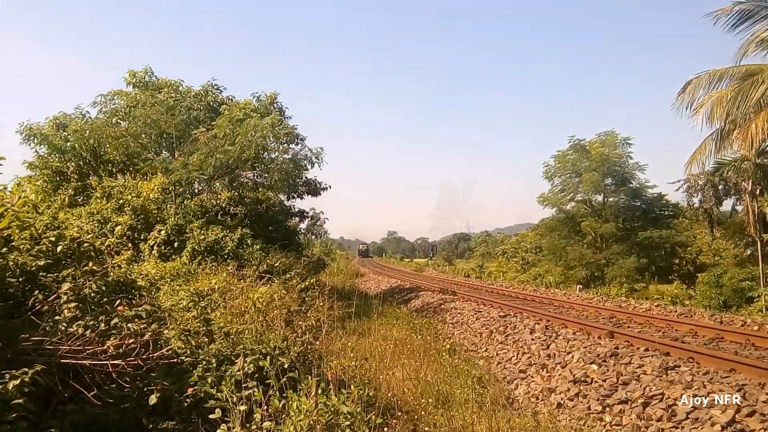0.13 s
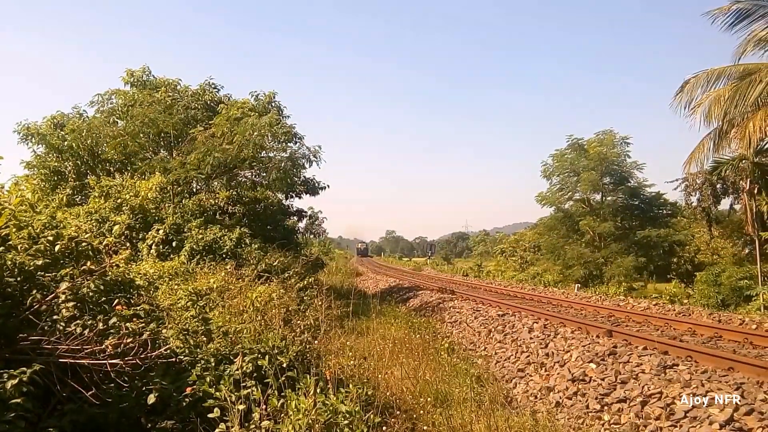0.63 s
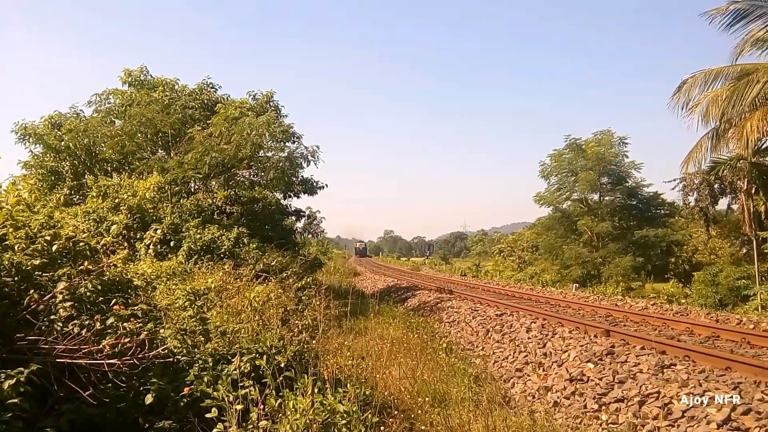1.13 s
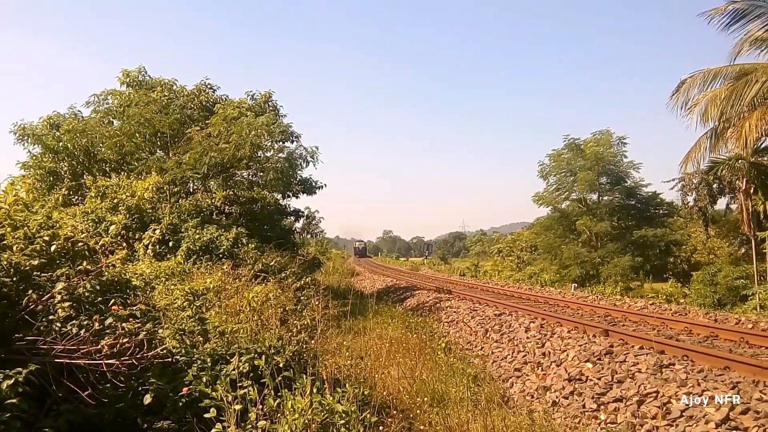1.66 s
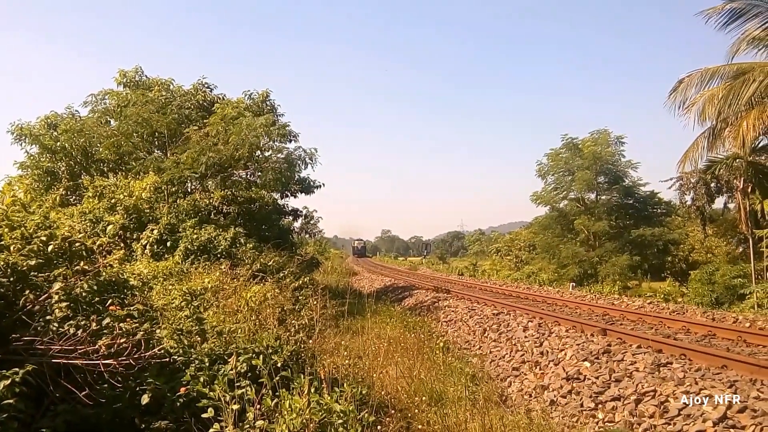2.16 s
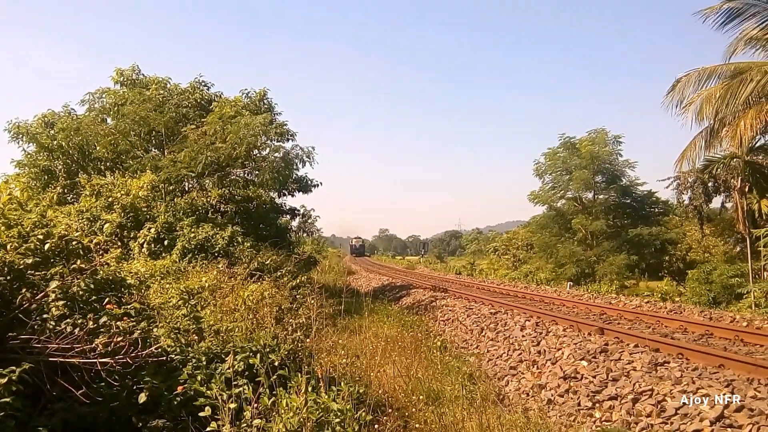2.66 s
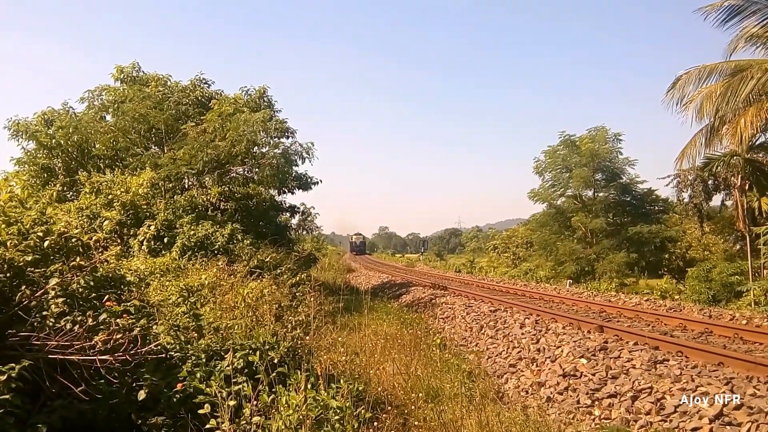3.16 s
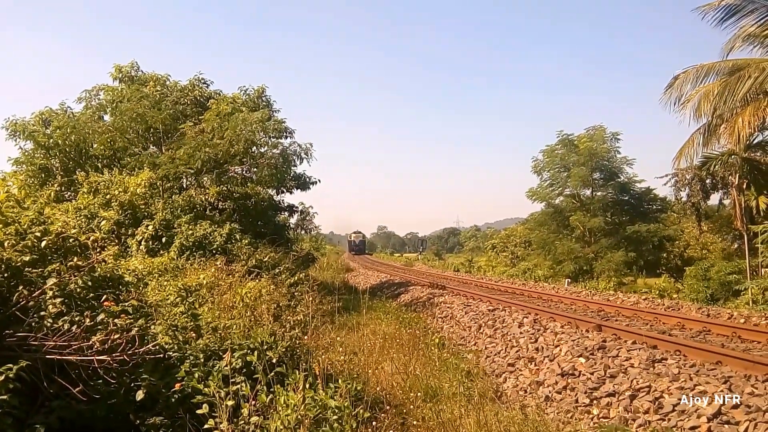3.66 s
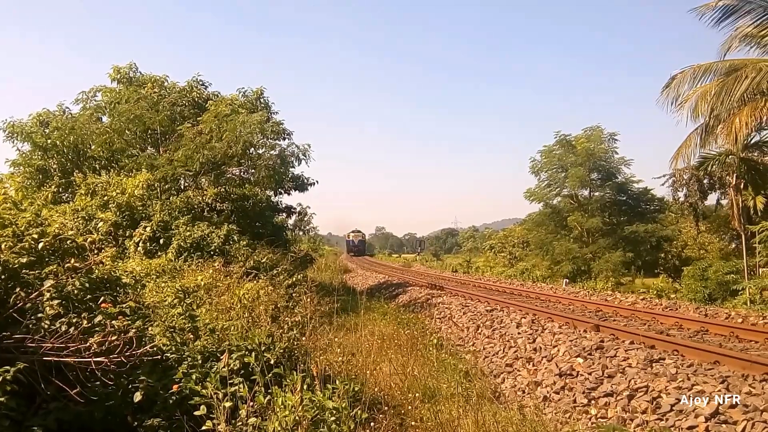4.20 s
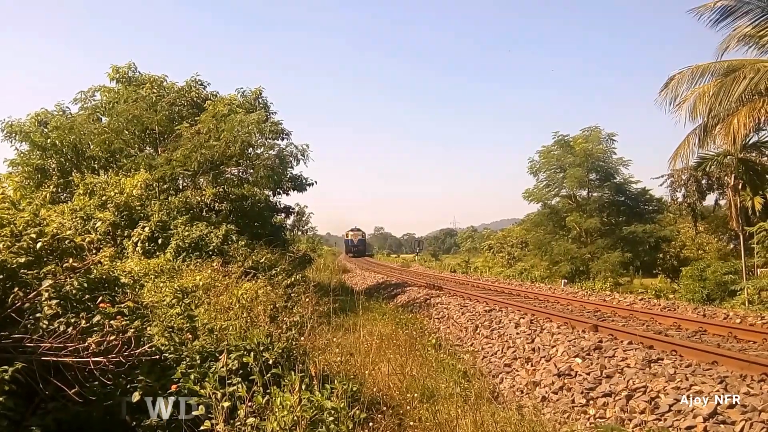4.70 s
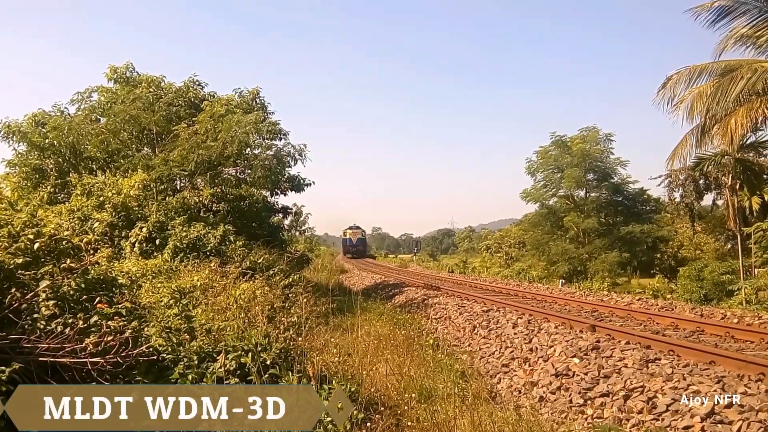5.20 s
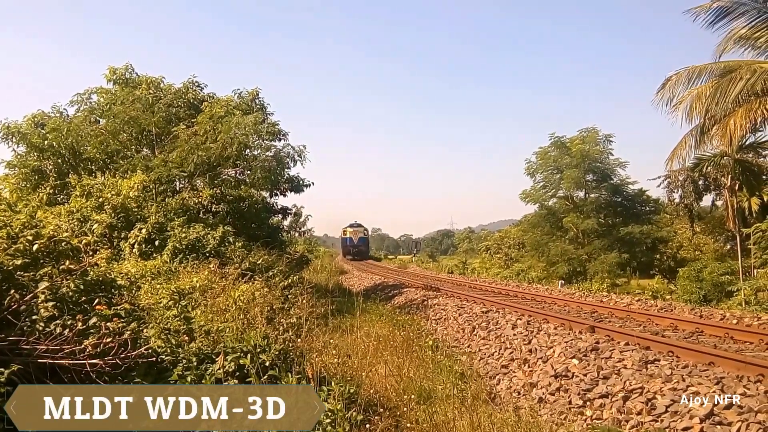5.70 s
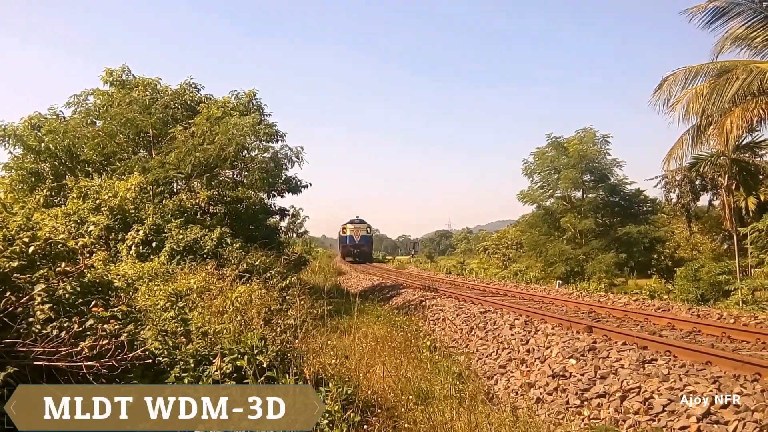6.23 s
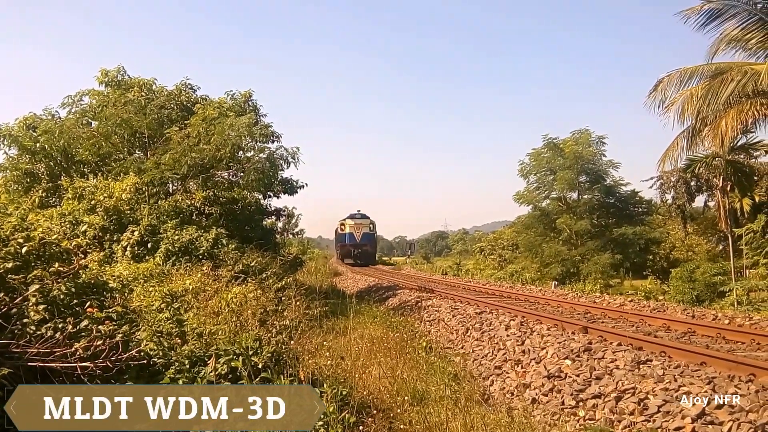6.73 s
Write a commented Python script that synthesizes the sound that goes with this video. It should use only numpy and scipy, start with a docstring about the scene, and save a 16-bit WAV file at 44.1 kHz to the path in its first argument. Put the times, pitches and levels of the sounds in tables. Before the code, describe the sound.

A distant diesel locomotive blows a steady two-note air horn, pauses briefly, squeals back into a second louder blast as its rumble nears along a country track.

```python
"""Two air horns a fifth apart sound from a diesel locomotive coming along a country track from far off.
Each is a sum of aligned overtones plus breath and hiss; it is blowing at the start, shuts once and blows again.
The sound arrives straight and by a bent second path through warm air; trees return late, filtered copies.
Firing pulses ring exhaust resonances under shaped noise, and insects tick in the grass near the microphone."""
import sys
import numpy as np
from scipy import signal
from scipy.fft import rfft, irfft, next_fast_len
from scipy.io import wavfile
from scipy.ndimage import uniform_filter1d

SR = 44100
rng = np.random.default_rng(int(sys.argv[2]) if len(sys.argv) > 2 else 0)


def output_pcm(signal):
    """Save a mono or channel-first signal as 16-bit PCM at the path in sys.argv[1].

    Samples are clipped to [-1, 1] before scaling.
    """
    pcm = np.clip(np.atleast_2d(signal).T, -1, 1) * 32767
    wavfile.write(sys.argv[1], SR, np.round(pcm).astype(np.int16))


def decibels_to_gain(level_db):
    """Convert a level in decibels to a linear amplitude gain (20 dB per decade)."""
    exponent = np.asarray(level_db, float) / 20
    return 10 ** exponent


N = 302083
TIME = np.arange(N) / SR
STEP = 64  # samples between points of the slow curves


def curves(table, s=TIME):
    """Linear interpolation: each column of a time table, read at the times s."""
    rows = np.array(table)
    return [np.interp(s, rows[:, 0], column) for column in rows.T[1:]]


def spectrum(table, hz):
    """Spectral envelope: dB of an (Hz, dB) table, straight on a log frequency axis."""
    rows = np.array(table)
    return np.interp(np.log(np.maximum(hz, 1)), np.log(rows[:, 0]), rows[:, 1])


def colour(x, table):
    """Linear filtering: multiply the spectrum of x by the gains of an (Hz, dB) table."""
    size = next_fast_len(N)
    gain = decibels_to_gain(spectrum(table, np.fft.rfftfreq(size, 1 / SR)))
    return irfft(rfft(x, size) * gain, size)[..., :N]


def band(x, hz, width):
    """Resonance: a two-pole filter with gain 1 at the centre."""
    return signal.lfilter(*signal.iirpeak(hz, hz / width, SR), x)


def unit(x):
    """Normalization: scale to rms 1."""
    return x / np.sqrt(np.mean(x ** 2))


def walk(rate, size, per_s=SR):
    """Random drift: twice-smoothed noise with about rate turns a second and rms 1."""
    k = max(int(per_s / rate), 1)
    return unit(uniform_filter1d(uniform_filter1d(rng.standard_normal(size), k), k))


# Overtones of each horn at full pressure, before the gain of the air. Each row: frequency in Hz, level in dB.
LOW_HORN = [(305, -49.5), (610, -34.5), (914, -27.5), (1219, -32.5), (1524, -38.5), (1828, -36),
            (2133, -41), (2438, -39), (3048, -37.5), (3962, -40.5), (5181, -44), (6704, -46.5),
            (9142, -53.5), (14933, -64)]
HIGH_HORN = [(464, -39.5), (927, -20), (1391, -36), (1855, -33.5), (2318, -36.5), (2782, -38),
             (3246, -36.5), (4173, -38), (5100, -40.5), (6491, -44.5), (7882, -44), (9273, -59),
             (12055, -56.5), (14837, -49)]
# Frequencies in Hz between which the gain of the air is interpolated.
AIR_HZ = [305, 460, 920, 1700, 4200, 10000]
# Second path: its lag widens, drops sharply and wavers, and its share is strongest near 3.5 s.
# Each row: time in seconds, lag in ms, share of the straight path (0-1).
PATH = [(0, 0.15, 0), (1.3, 0.25, 0.34), (2.2, 0.33, 0.1), (2.65, .35, 0.19), (2.95, 0.059, 0.03),
        (3.3, .11, 0.78), (3.55, 0.062, 0.99), (3.85, 0.074, .95), (4.4, .13, 0.34), (5.2, 0.14, 0.19),
        (6.85, 0.099, 0)]


def horn(index, overtones, eddies):
    """Harmonic synthesis: a reed slams once a cycle; each overtone is dimmed, combed and shaken by the air."""
    s = TIME[::STEP]
    air_db = air(index, s)
    mid_db, top_db = air_db[3], air_db[5]
    lag_ms, share = curves(PATH, s)
    pressure, turns = valve(index)
    pressure, pitch_hz = pressure[::STEP], BLASTS[index][0][2]
    # the reed never closes at quite the same instant
    turns = turns + .0022 * walk(350, N)
    tone = np.zeros(N)
    for k in range(1, int(overtones[-1][0] / pitch_hz + 1.5)):
        f = k * pitch_hz
        place = np.interp(np.log(f), np.log(AIR_HZ), np.arange(len(AIR_HZ)))
        j = min(int(place), len(AIR_HZ) - 2)
        gain_db = air_db[j] + (place - j) * (air_db[j + 1] - air_db[j])
        gain_db = gain_db * max(f / 1e4, 1) ** 1.1
        scatter = scattering(f, k, gain_db, eddies)
        # weak pressure softens the slam, so high overtones come last and go first
        gain = decibels_to_gain(spectrum(overtones, f) + gain_db) * pressure ** (1.08 + f / 830.0)
        second_path = share * np.exp(-2j * np.pi * f * lag_ms / 1000)
        gain = gain * scatter * (1 + second_path)
        phase = 2 * np.pi * (k * turns % 1) - .4  # the slam leans toward a suction spike
        tone += np.interp(TIME, s, gain.real) * np.sin(phase)
        tone += np.interp(TIME, s, gain.imag) * np.cos(phase)
    return np.sqrt(2) * tone + breath(pressure, mid_db) + spit(index, turns, pressure, top_db)


# Valve timing and pitch of the low horn, then of the high horn.
# Each row: valve opens in seconds, valve shuts in seconds, steady pitch in Hz.
BLASTS = [
    [(-0.49956, 4.405, 304.715), (5.2685, 7.5, 304.85)],
    [(-0.5, 4.41, 463.51), (5.02, 7.5, 463.56)],
]
# Pressure at the reeds. Each list: low horn, high horn.
HOLD = [0.96, 0.87]  # share of full pressure
ATTACK_S = [0.087, 0.103]  # rise time in seconds
RELEASE_S = [0.072, 0.09]  # decay constant in seconds
LINGER = [0.29, 0.03]  # share left in the pipe after the valve shuts
EMPTY_S = [0.87, 0.11]  # seconds until the pipe is empty
# Sharpness in Hz at the start of a blast, low horn and high horn.
START_SHARP_HZ = [.05, .6]
WEAK_SHARP_HZ, SETTLE_S = 5., .7  # extra pitch at no pressure, and settling time constant


def valve(index):
    """Pneumatic envelope: pressure at one reed, and its turns, which run sharp on weak pressure and at a start."""
    pressure, turns = np.zeros(N), np.zeros(N)
    for opens, shuts, hz in BLASTS[index]:
        age, after = np.maximum(TIME - opens, 0), np.maximum(TIME - shuts, 0)
        left = np.clip(LINGER[index], 0, 1)
        rise = np.sin(np.pi / 2 * np.minimum(age / ATTACK_S[index], 1))
        emptying = np.clip(1 - (after / EMPTY_S[index]) ** 4, 0, 1)
        share = rise * emptying * (left + (1 - left) * np.exp(-after / RELEASE_S[index]))
        sharp_hz = WEAK_SHARP_HZ * (1 - share) + START_SHARP_HZ[index] * np.exp(-age / SETTLE_S)
        pressure = np.where(age > 0, HOLD[index] * share, pressure)
        turns = np.where(age > 0, hz * age + np.cumsum(sharp_hz * (age > 0)) / SR, turns)
    return np.clip(pressure, 1e-4, 1), turns


def breath(pressure, mid_db):
    """Turbulence noise: air rushing through the bell, a fluttering hiss around two resonances."""
    flutter = decibels_to_gain(2.5 * walk(25, N))
    rush = unit(band(band(rng.standard_normal(N), 870.0, 330.0), 1400.0, 510.0))
    return rush * flutter * np.interp(TIME, TIME[::STEP], pressure * decibels_to_gain(mid_db - 53.5))


def spit(index, turns, pressure, top_db):
    """Pulsed noise: a spit of hiss at every slam of the reed, arriving by both paths."""
    s = TIME[::STEP]
    hiss = unit(band(rng.standard_normal(N), 3600.0, 7000.)) * np.exp(-(turns % 1) / 1.2)
    lag_ms, share = curves(PATH)
    hiss = hiss + share * np.interp(TIME - lag_ms / 1000, TIME, hiss)
    level_db = top_db + 3 * walk(5, len(s), SR / STEP) - (42 + 2 * index)
    return hiss * np.interp(TIME, s, pressure ** 2 * decibels_to_gain(level_db))


def scattering(f, k, gain_db, eddies):
    """Turbulent scattering: eddies shake short waves more, and more over a long way."""
    depth = .26 * min(max(f / 1500. - .35, 0), 1.3) * np.clip(.5 - gain_db / 8, .4, 3)
    # neighbouring overtones can share an eddy; each also has one of its own
    scatter = 1 + depth * (eddies[int(f / 450)] + .5 * eddies[-k])
    return scatter / np.sqrt(1 + 2.5 * depth ** 2)


# Level of the lowest tone, swallowed by the ground until the train is near.
# Each row: time in seconds, level in dB.
GROUND = [(0, -34.5), (1.2, -23), (1.9, -6.5), (2.2, -18.5), (3.3, -1.5), (3.7, -14), (3.95, -5), (4.3, 2),
          (6.05, 0.5), (6.85, 10)]
# Level of the strongest tone, near 920 Hz. Each row: time in seconds, low horn in dB, high horn in dB.
STRONG_TONE = [(0, -2, -16.5), (.3, -10, -11), (.8, -15.5, -10.5), (1.2, -13.5, -9.5), (1.6, -15.5, -11),
               (2, -16, -16), (2.4, -17.5, -10), (3, -13, -10), (3.7, -16, -9.5), (4.2, -9, -5),
               (4.4, -8, -3), (5.4, -4, 1), (6.1, -6, -1.5), (6.85, 0.5, 3.5)]
# Each row: time in seconds, level near 460 Hz in dB, level near 1.7 kHz in dB, level near 4 kHz in dB.
BAND_LEVELS = [(0, -9, -16.5, -18), (.25, -7.5, -15.5, -13.5), (.9, -15.5, -13.5, -22),
               (1.4, -11.5, -14.5, -14), (1.8, -12.5, -15.5, -21), (2.6, -4.5, -7.5, -13), (3, -4, -5, -15),
               (3.25, -7, -4, 0.5), (3.7, -10, -4, 2), (4.15, -3, 2, 0), (5.4, 0, 3.5, -0.5),
               (6.85, 7, 3, -6)]
# The top near 10 kHz: level at NEAR_S seconds, rise while nearing, and random waver.
TOP_DB, TOP_DB_PER_S, NEAR_S, WAVER_DB = 2, 4, 6, 1


def air(index, s):
    """Propagation: gain in dB of distance, ground and air at each AIR_HZ; the top clears as the train nears."""
    low, mid, treble = curves(BAND_LEVELS, s)
    top = TOP_DB + TOP_DB_PER_S * (s - NEAR_S) + WAVER_DB * walk(6, len(s), SR / STEP)
    return np.array([*curves(GROUND, s), low, curves(STRONG_TONE, s)[index], mid, treble, top])


def steepen(x):
    """Nonlinear propagation: crests of a loud wave outrun its troughs."""
    return np.interp(TIME + 9e-5 * x, TIME, x)


# The low reed squeals before it catches. Each row: time in seconds, frequency in Hz, mean level in dB.
SQUEAL = [(4.955, 2010, -85), (4.98, 2060, -57), (5.03, 2060, -53), (5.09, 2035, -51), (5.2, 2020, -53),
          (5.3, 1995, -55), (5.34, 1985, -85)]
# Starting levels in dB of the squeal's fundamental and overtones, relative to that mean level.
SQUEAL_OVERTONES_DB = [0, 3, 0, -15, -13, -21]
# It also moans, sinking in pitch until it fades. Each row: time in seconds, frequency in Hz, mean level in dB.
MOAN = [(5.1, 1373, -61.5), (5.15, 1356, -60), (5.24, 1273, -37), (5.29, 1350, -85)]


def squeal(table, overtones_db):
    """Unsteady self-oscillation: a thin, shaky whistle of one or more harmonics."""
    hz, db = curves(table)
    turns = np.cumsum(hz * (1 + .005 * walk(150, N))) / SR
    db = db + 2 * walk(40, N)
    # the overtones die away as the reed slows, higher ones faster
    fade_db = -18. * np.maximum(TIME - table[1][0], 0)
    whistle = 0
    for k, overtone_db in enumerate(overtones_db):
        whistle = whistle + decibels_to_gain(overtone_db + k * fade_db) * np.sin(2 * np.pi * (k + 1) * turns)
    return np.sqrt(2) * decibels_to_gain(db) * whistle


# Echoes off trees, flatter because the train nears them less directly.
# Each row: lag in seconds (at 4.5 s), mean level in dB, pitch drop in percent.
ECHOES = [(.13, -33, 0.31), (0.202, -33, 0.57), (0.272, -31, 0.32), (0.339, -31, 0.37), (.43, -34, .5),
          (0.539, -36, 0.69)]


def trees(x):
    """Reflection and diffusion: late, slightly slowed, dull and fluttering copies, then a smooth tail."""
    dull = signal.lfilter(*signal.butter(1, [600., 2200.], "bandpass", fs=SR), x)
    echoes = 0
    for lag_s, db, drop_percent in ECHOES:
        when = TIME - lag_s - drop_percent / 100 * (TIME - 4.5) + 1.1e-4 * walk(25, N)
        fade_in = np.clip(when / .1, 0, 1)
        echoes = echoes + decibels_to_gain(db + 4 * walk(12, N)) * fade_in * np.interp(when, TIME, dull)
    # leaves and bushes scatter the rest; the tail falls 60 dB in 1.3 s but is cut at 1 s
    age = TIME[:SR]
    leaves = rng.standard_normal(SR) * np.clip(age / 0.049, 0, 1) * 10 ** (-3 * age / 1.3)
    tail = signal.fftconvolve(dull, leaves / np.linalg.norm(leaves))[:N]
    return echoes + decibels_to_gain(-29) * tail


# Each row: time in seconds, throb level in dB before a fixed 5 dB lift, roar level in dB.
ENGINE = [(0, -59.5, -52.5), (1, -56.5, -56.5), (2, -53.5, -55.5), (3, -53.5, -53), (4, -52.5, -47.5),
          (4.7, -46, -53), (5.3, -48.5, -44.5), (6, -48.5, -49.5), (6.85, -44, -44)]
# Exhaust resonances. Each row: frequency in Hz, width in Hz of the first of two filters, gain in dB.
EXHAUST = [(73.7, 7.5, -2), (96, 15.7, 0.5), (106.7, 56, 0.5), (135, 77, -10.5), (215, 12.6, -0.5)]
# Shape of the roar. Each row: frequency in Hz, relative level in dB.
ROAR = [(20, -14), (45, -10), (70, 1.5), (160, -22), (300, -16), (700, -15.5), (1500, -22), (3500, -25),
        (6500, -36.5), (8000, -35.5), (15500, -56)]
FIRING_HZ = 37.2


def engine():
    """Resonance under pulses: uneven firings, strong and weak in turn, ring the exhaust; fans and wheels roar."""
    throb_db, roar_db = curves(ENGINE)
    count = int(N / SR * 40)
    chance = rng.standard_normal((count, 2))
    at = (np.arange(count) + 0.017 * chance[:, 0]) / FIRING_HZ * SR
    keep = (at >= 0) & (at < N)
    strength_db = 2. * chance[:, 1] - 1.5 * (np.arange(count) % 2)
    pulses = np.zeros(N)
    pulses[at[keep].astype(int)] = decibels_to_gain(strength_db)[keep]
    puffs = unit(pulses) + 1.45 * rng.standard_normal(N)
    throb = 0
    for hz, width, db in EXHAUST:
        throb = throb + decibels_to_gain(db) * band(band(puffs, hz, width), hz, 1.1 * width)
    roar = colour(rng.standard_normal(N), ROAR) * decibels_to_gain(0.77 * walk(12, N))
    return decibels_to_gain(throb_db + 5.0) * unit(throb) + decibels_to_gain(roar_db) * unit(roar)


# Insect rasps. Each row: start in seconds, level in dB before the rasp's envelope.
INSECT = [(0.8704, -66), (1.1189, -61), (1.273, -67), (1.4227, -62), (1.5549, -61), (1.721, -65),
          (1.8851, -66), (1.9989, -65), (2.1655, -58), (2.372, -55.5), (2.699, -69), (2.923, -73),
          (3.8766, -57), (4.559, -53), (4.6503, -61), (4.8545, -59), (4.9322, -60), (5.0135, -56)]


def insects():
    """Stridulation: short rasps of rapidly fluctuating noise in two high wing resonances."""
    shape = 0
    for start_s, db in INSECT:
        after = np.maximum(TIME - start_s, 0)
        envelope = np.exp(-after / 0.014) * np.minimum(after / .008, 1)
        shape = shape + decibels_to_gain(db) * (TIME > start_s) * envelope
    clicks = rng.standard_normal(N) * decibels_to_gain(4. * walk(500, N))
    upper = unit(band(band(clicks, 15050., 900.), 15050., 1200.))
    lower = unit(band(band(clicks, 11400., 500.), 11400., 700.))
    return shape * (upper + 0.44 * lower)


def scene():
    """Superposition: both horns pass through the same eddies of air, then every source adds up."""
    size = len(TIME[::STEP])
    eddies = np.array([walk(4, size, SR / STEP) + 1j * walk(4, size, SR / STEP) for _ in range(90)])
    horns = steepen(horn(0, LOW_HORN, eddies) + horn(1, HIGH_HORN, eddies))
    horns = horns + squeal(SQUEAL, SQUEAL_OVERTONES_DB) + squeal(MOAN, [0])
    return (horns + trees(horns) + engine() + insects())[None]


def top_cut(x):
    """Nothing passes above the cut-off."""
    return signal.sosfilt(signal.butter(12, 15670, fs=SR, output="sos"), x)


# Microphone response, dipping above 7 kHz and peaking near 15 kHz. Each row: frequency in Hz, gain in dB.
MICROPHONE = [(100, -3.5), (6500, 6), (8000, -5.5), (13800, -5), (14700, 7), (15500, 5)]


def record(dry):
    """Intermodulation: loud blasts bend the capsule a little, mixing the two horns, ahead of its response."""
    bent = dry + 0.34 * dry ** 2 - 0.81 * dry ** 3
    mix = colour(bent - bent.mean(), MICROPHONE)
    return top_cut(mix)


dry = scene()
out = record(dry)
output_pcm(out)
```